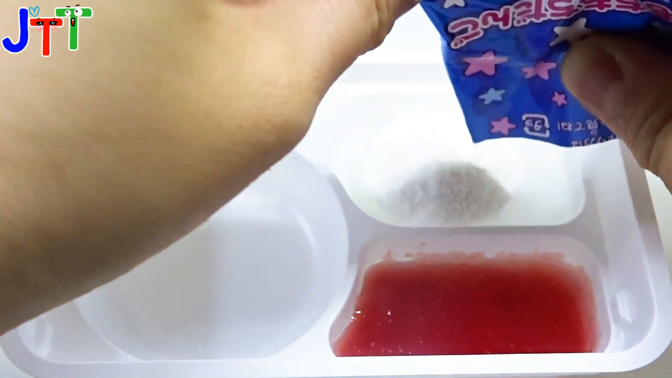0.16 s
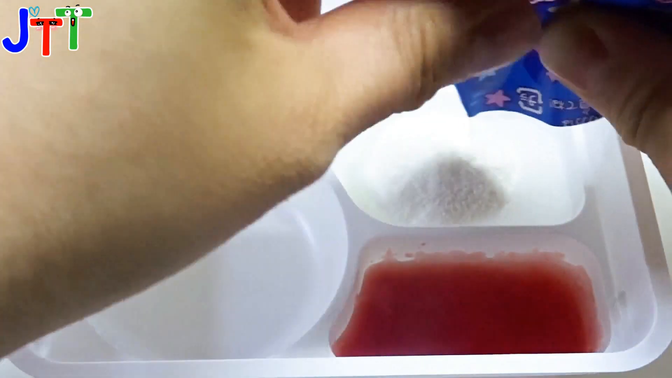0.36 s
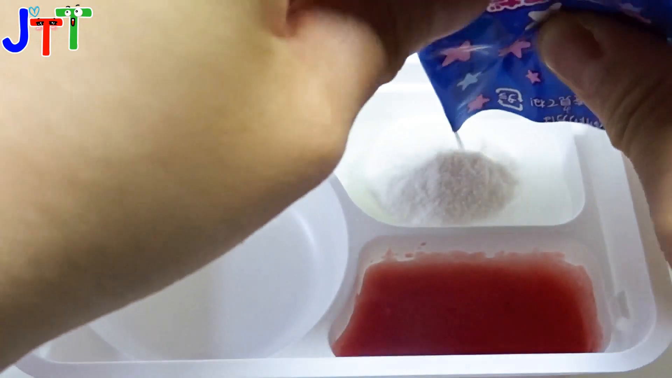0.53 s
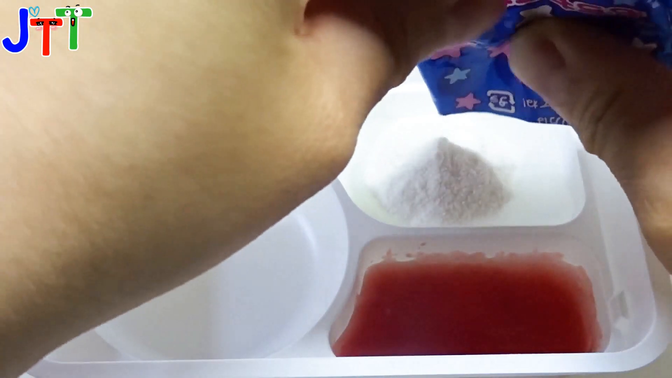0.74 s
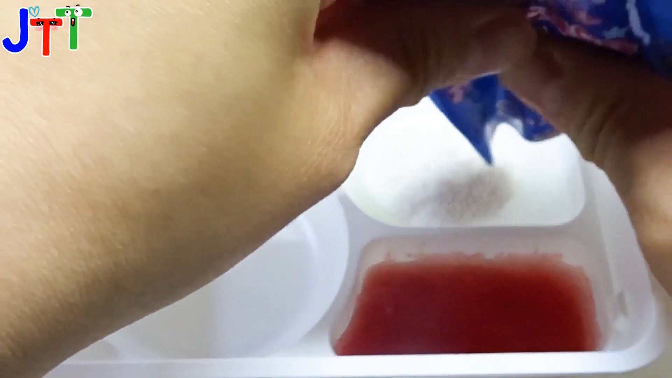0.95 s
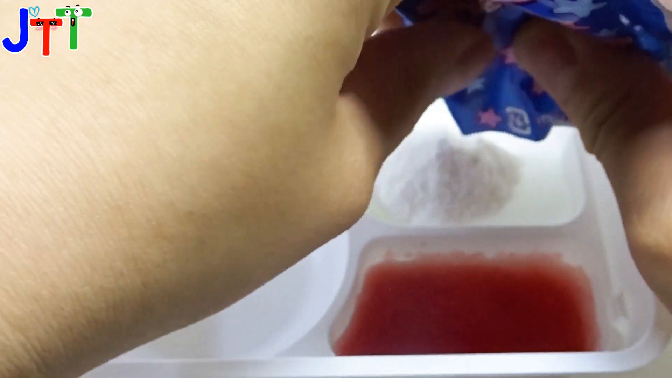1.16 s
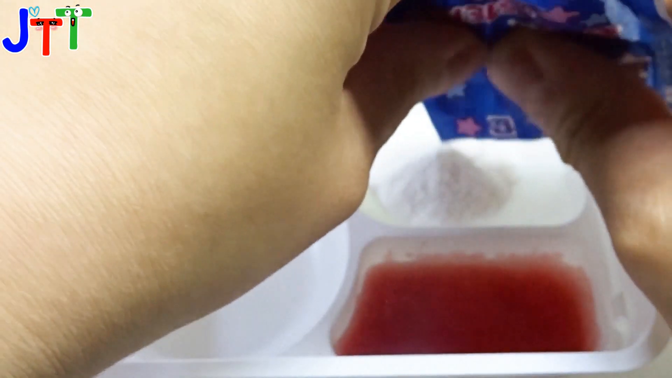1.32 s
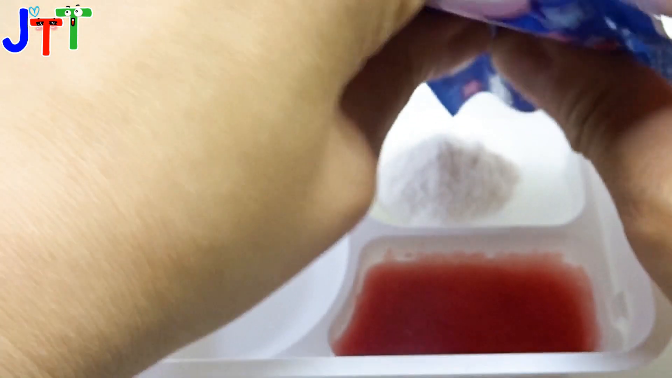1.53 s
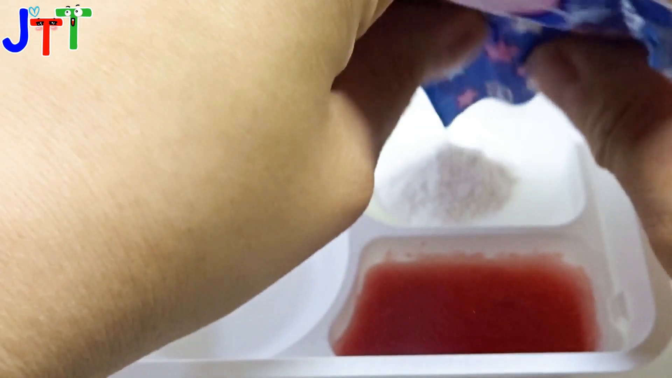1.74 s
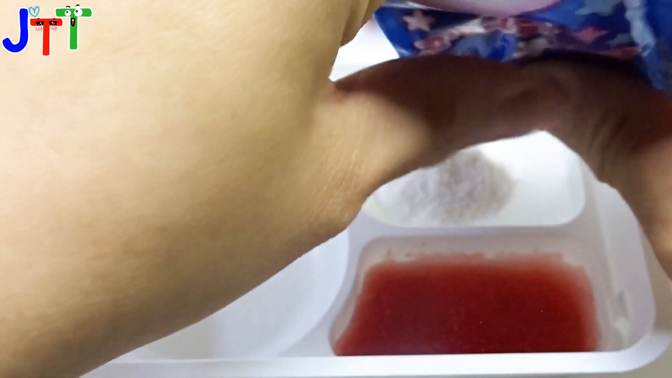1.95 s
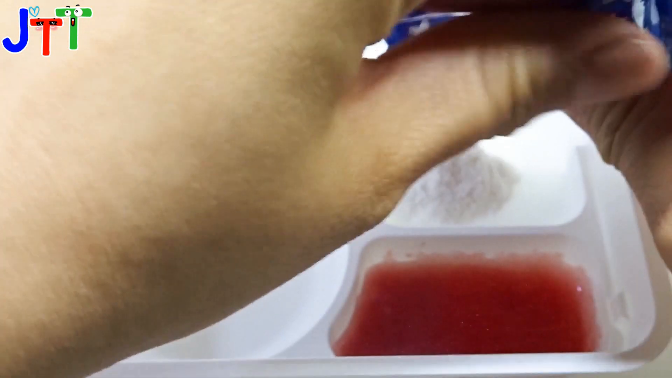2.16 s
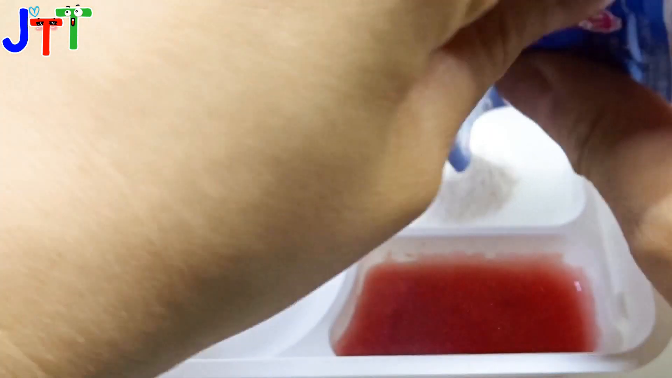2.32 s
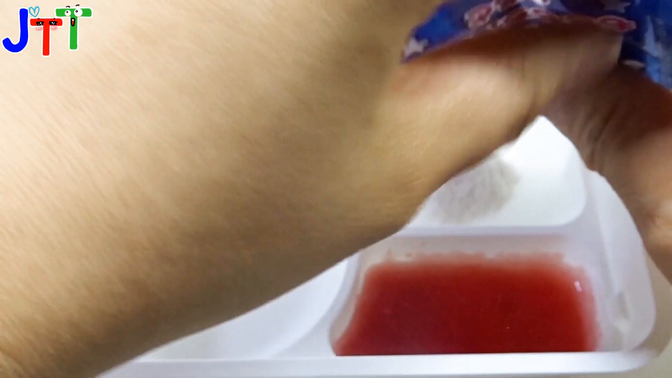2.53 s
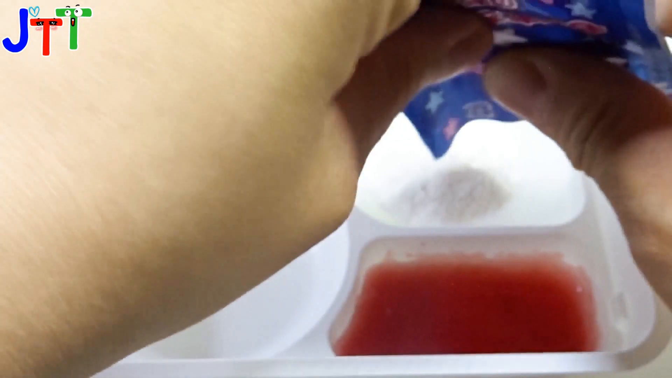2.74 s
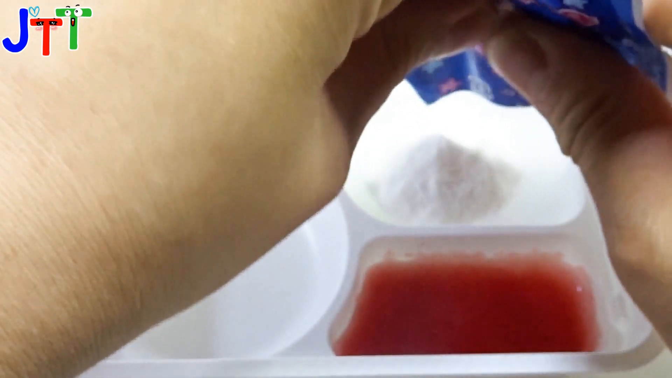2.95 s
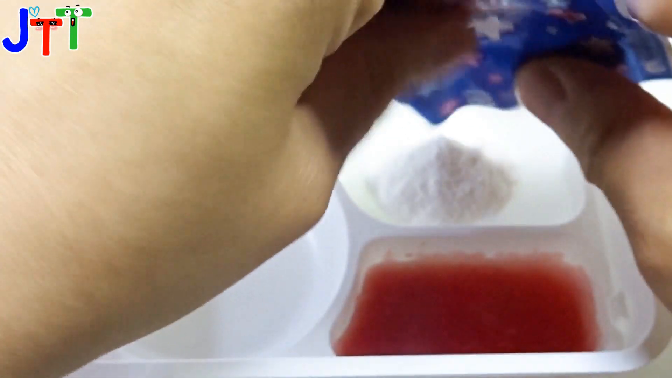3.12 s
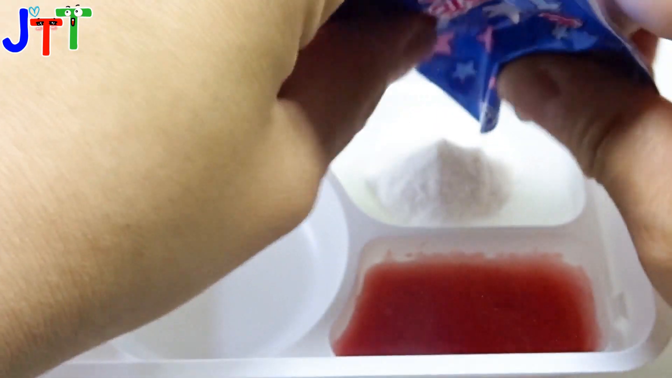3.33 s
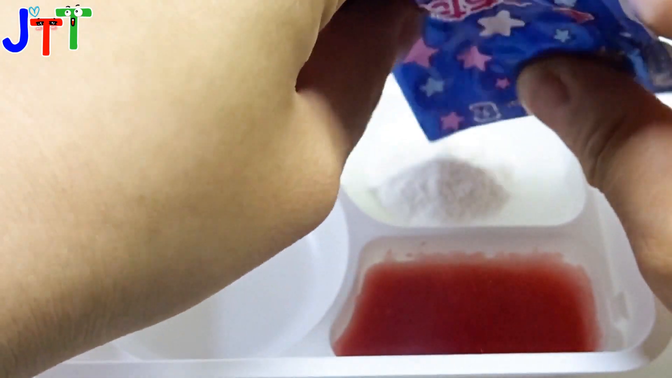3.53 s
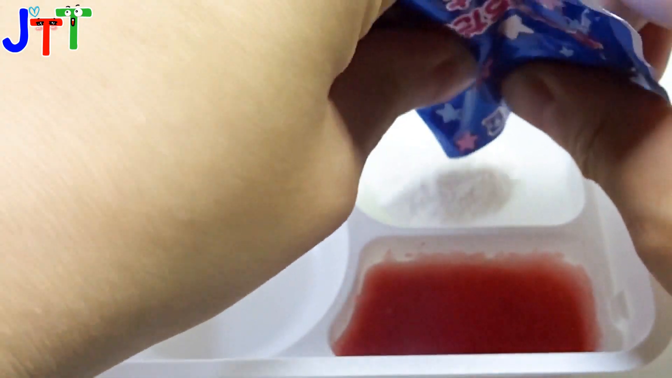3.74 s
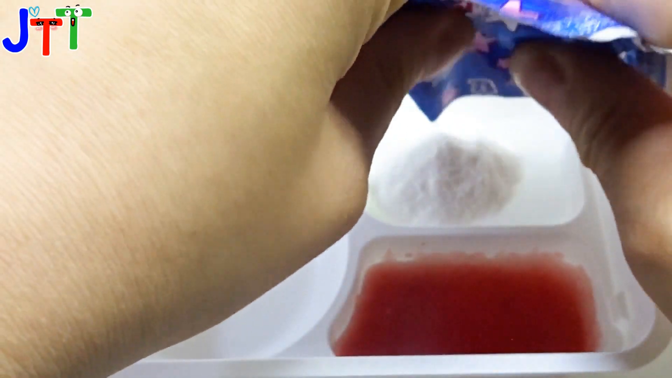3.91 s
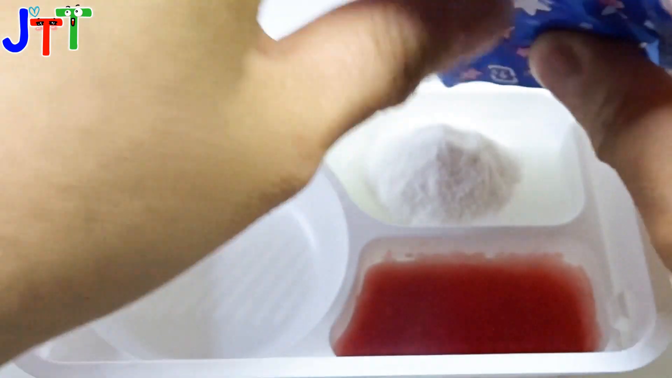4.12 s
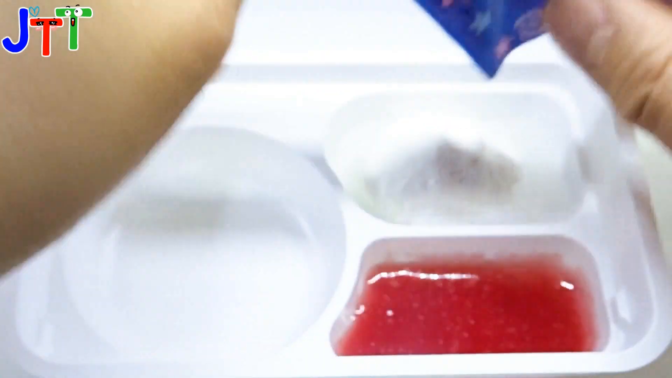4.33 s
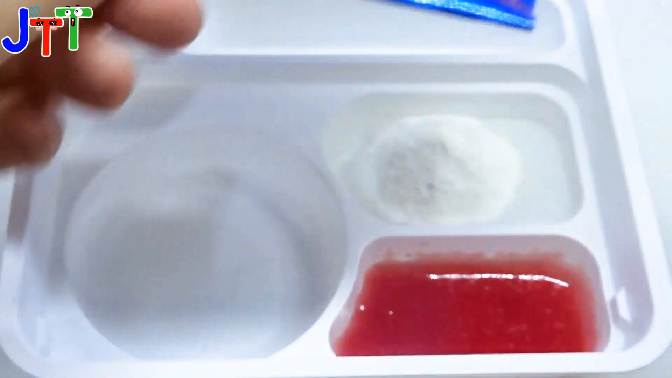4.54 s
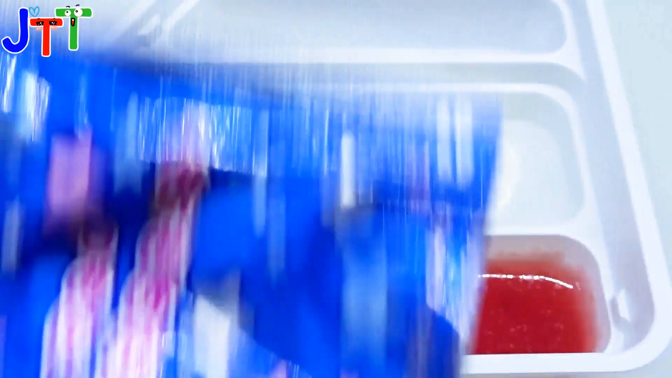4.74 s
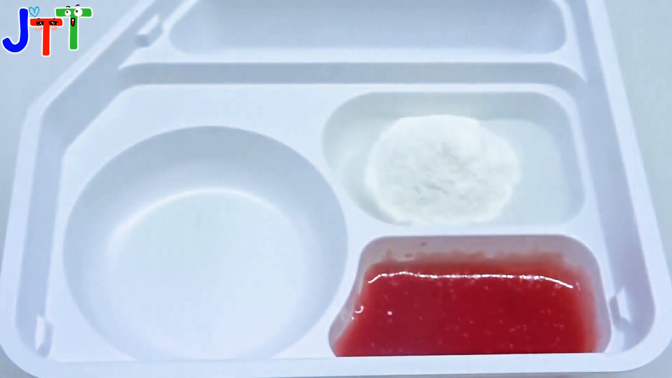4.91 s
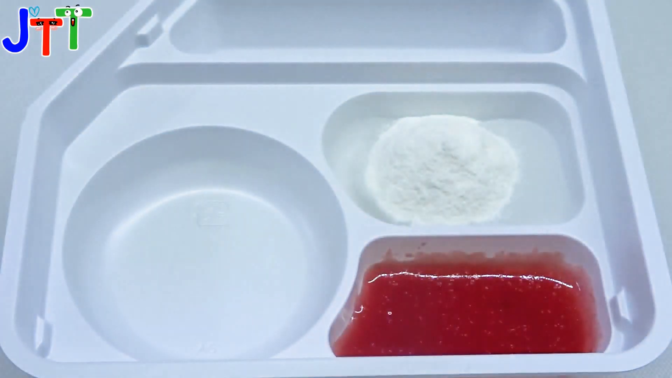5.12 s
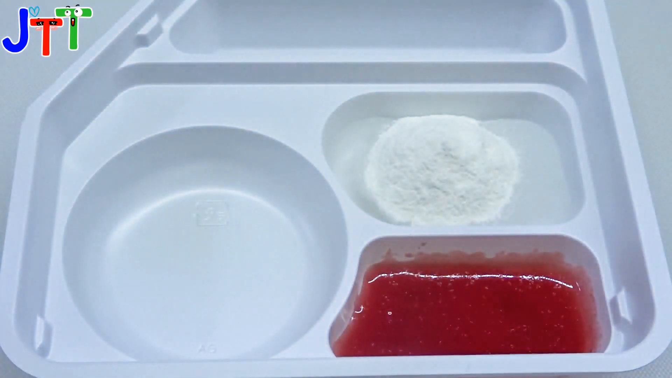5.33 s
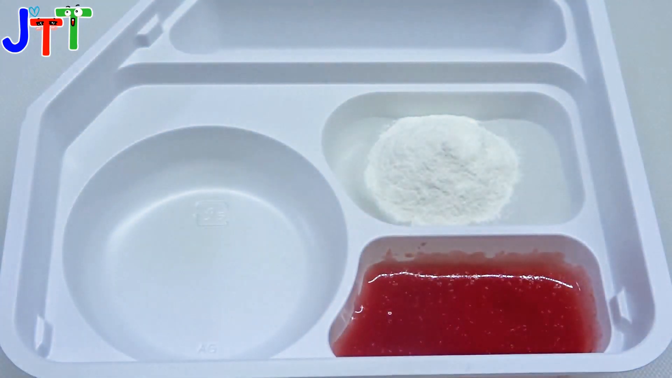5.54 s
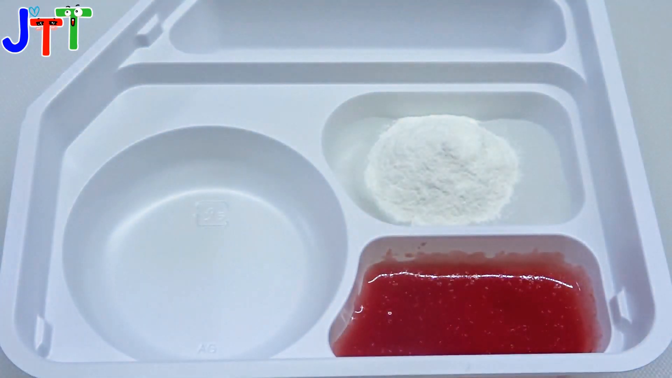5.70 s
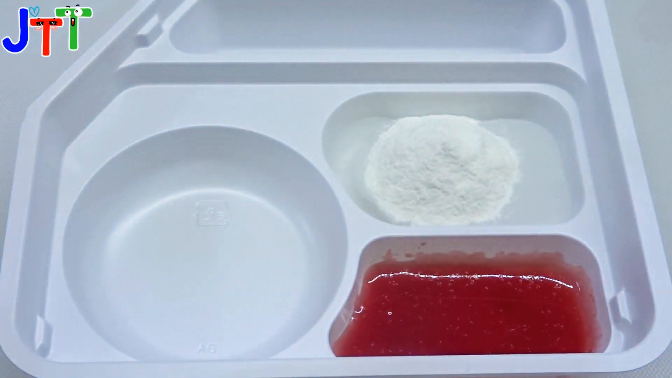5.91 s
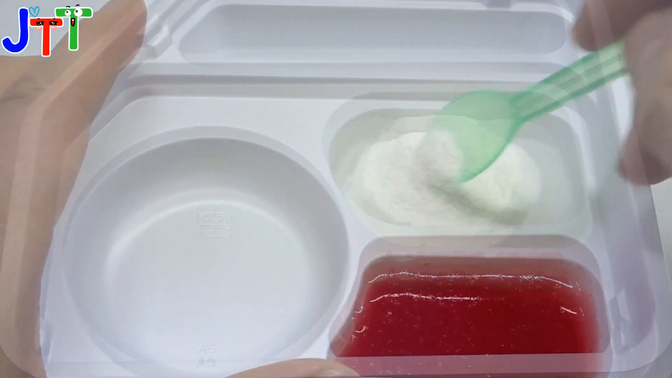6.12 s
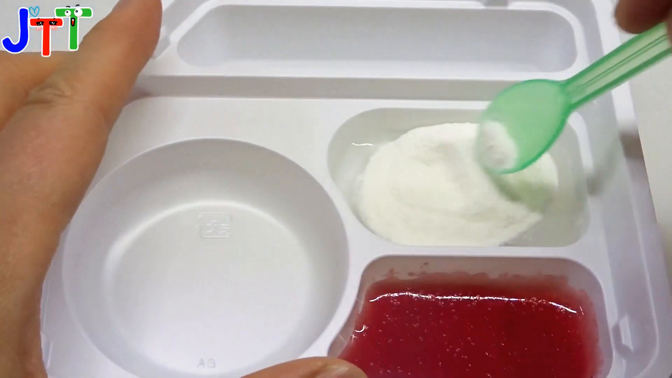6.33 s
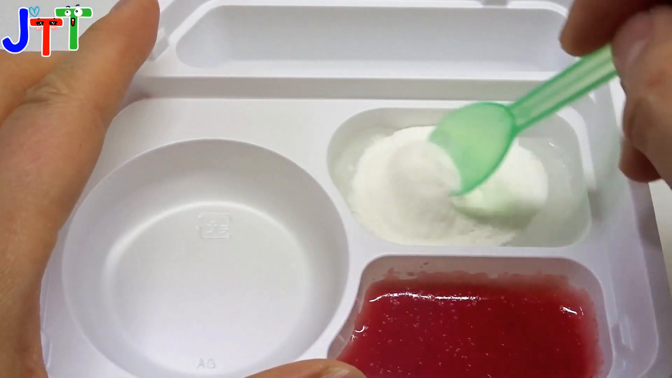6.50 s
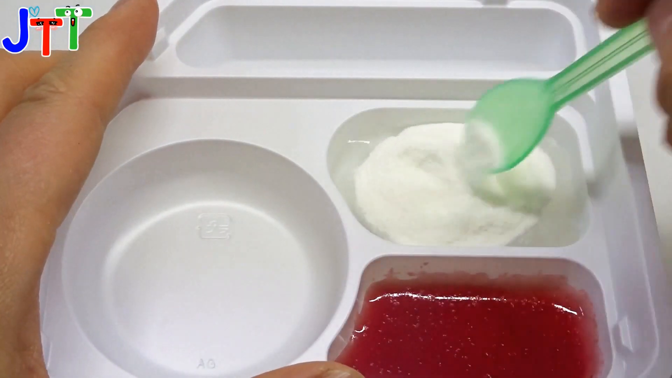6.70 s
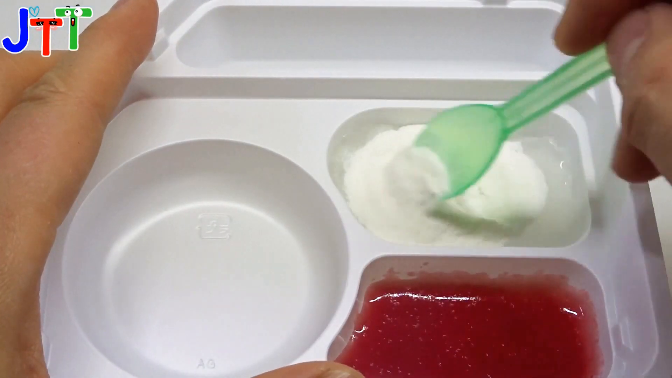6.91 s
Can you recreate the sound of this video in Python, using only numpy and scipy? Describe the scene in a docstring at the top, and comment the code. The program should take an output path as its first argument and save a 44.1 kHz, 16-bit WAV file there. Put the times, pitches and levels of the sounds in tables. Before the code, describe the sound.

Very close in a small room, a foil sachet is squeezed and shaken, giving crisp irregular snaps, fine crackle and a few dull bumps against a plastic tray. After nearly five seconds only a low, faint hum remains. Light plastic taps come, the sound abruptly drops and fades back with a higher hum and slight hiss, and a spoon knocks the tray and scrapes through powder.

```python
"""Over a low hum, foil creases snap one by one through a fine crackle, with soft bumps, close by in a small room.
Light plastic taps follow; the sound drops abruptly, fades in on a higher hum, and taps mix with gritty scrapes.
The foil sachet is squeezed and shaken: short noise bursts and swells of tiny grains ring its hollow body.
A plastic spoon knocks a resonant tray and ploughs powder, which is again made of swelling grains.
Filtered noise gives the air, wavering sines the hum, and decaying noise the room's echoes."""
import sys
import numpy as np
from scipy import signal
from scipy.fft import rfft
from scipy.io import wavfile
from scipy.ndimage import uniform_filter1d

SR = 44100
rng = np.random.default_rng(int(sys.argv[2]) if len(sys.argv) > 2 else 0)


def inscribe(sig):
    """Save sig as 16-bit PCM at rate SR to the path in sys.argv[1].

    A 1-D sig is mono; a 2-D sig holds one channel per row.
    Samples are clipped to [-1, 1] before scaling.
    """
    pcm = np.round(np.clip(np.atleast_2d(sig).T, -1, 1) * 32767)
    wavfile.write(sys.argv[1], SR, pcm.astype(np.int16))


N = 311346
TAPS = 4096  # length of the colouring filters
HZ, TIME = np.fft.rfftfreq(TAPS, 1 / SR), np.arange(N) / SR
BREAK_S = 6.028  # when the sound drops and the background moves up in pitch

# squeezes and shakes of the sachet, before layer trims:
# (start [s], end [s], level [dB], brightness [dB per octave])
SQUEEZE_MOVES = [(0.128, 0.144, -29, -1.2), (0.498, 0.58, -34.5, -1.5), (0.68, 0.734, -35, -1.0),
                 (0.771, 0.925, -41, -1.7), (1.123, 1.211, -35.5, -1.0), (1.228, 1.294, -36, -4.5),
                 (1.407, 1.563, -40, -0.8), (1.638, 1.761, -46, -6), (1.845, 1.928, -36, 0.6),
                 (1.95, 2.013, -33.5, -1.8), (2.087, 2.221, -37.5, -1.5), (2.361, 2.429, -37.5, -3.4),
                 (2.435, 2.53, -32.5, 0.3), (2.826, 2.918, -36.5, -2), (3.316, 3.445, -35.5, -1.5),
                 (3.495, 3.608, -42.5, -1), (3.704, 3.812, -42, -3), (3.822, 3.892, -37, -2.0),
                 (4.034, 4.137, -32, -0.3), (4.202, 4.28, -39.5, 2.5), (4.388, 4.445, -53.5, -10),
                 (4.464, 4.519, -40.5, -1.4), (4.568, 4.647, -40.5, 0.9), (4.753, 4.776, -43.5, -12.5)]
# spectrum of creasing foil: (frequency [Hz], level [dB])
FOIL_SPECTRUM = [(130, -33), (330, -13), (520, -12), (690, -6.5), (880, -7.5), (1100, -3.5), (1700, -1),
                 (2450, -3.5), (3100, 0), (3650, -2), (4250, 0), (4900, 0.5), (8500, 0), (12000, -8),
                 (14000, -18), (16000, -41)]
# spectrum of gritty powder, which also colours the hiss: (frequency [Hz], level [dB])
POWDER_SPECTRUM = [(200, -12), (1100, -7.5), (2400, 2.5), (3800, -0.5), (5800, 1.5), (9000, -7),
                   (15500, -11)]
# channel difference of sound from close by: (frequency [Hz], side over mid [dB])
NEAR_WIDTH = [(600, -24.5), (2000, -17), (12000, -2)]
# channel difference of sound from all around: (frequency [Hz], side over mid [dB])
DIFFUSE_WIDTH = [(40, -10), (150, -20.5), (350, -12.5), (750, -5), (2500, -0.5)]


def amp(db):
    """Decibels to amplitude."""
    return 10 ** (np.asarray(db) / 20)


def rms(x):
    """Root mean square over all channels, kept above zero."""
    return np.sqrt(np.mean(x ** 2) + 1e-20)


def read(points, hz):
    """Reads a table by straight lines over log frequency."""
    f, value = np.transpose(points)
    return np.interp(np.log(hz + 1), np.log(f + 1), value)


def tilted(spectrum, db_per_octave):
    """Large facets and slow contacts sound dull, small and quick ones bright."""
    pivot_hz, flat_below_hz = 3500, 1000
    octaves = np.log2(np.maximum(HZ, flat_below_hz) / pivot_hz)
    return read(spectrum, HZ) + db_per_octave * octaves


def colour(x, db):
    """Causal minimum-phase filter with the given gain at each of HZ."""
    log_gain = np.log(amp(np.r_[db, db[-2:0:-1]]))
    response = np.fft.ifft(np.exp(np.conj(signal.hilbert(log_gain)))).real
    return signal.fftconvolve(x, response)


def stereo(pair, db, width):
    """Colours two signals into mid and side, with the width set over frequency."""
    mid = colour(pair[0], db)
    side = colour(pair[1], db + read(width, HZ))
    return np.array([mid + side, mid - side])


def add(mix, s, sound):
    """Lays a sound into the mix at s seconds, cut at the end of the mix."""
    part = mix[:, round(s * SR):][:, :sound.shape[1]]
    part += sound[:, :part.shape[1]]


def ring(x, modes):
    """What a body with these resonances adds to a sound."""
    out = 0
    for hz, width, db in modes:
        out = out + amp(db) * signal.lfilter(*signal.iirpeak(hz, hz / width, SR), x)
    return out


def click(shape_db, level_db, ring_s, after_db, after_s, facet_db):
    """A sudden buckle, a second slip just behind it and a weak after-ring, with resonances of its own."""
    t = TIME[:TAPS // 2]
    since_slip = t - (1 + 2 * rng.random()) * ring_s
    slip = rng.random() ** 2 * (since_slip > 0) * np.exp(-abs(since_slip) / ring_s)
    envelope = np.exp(-t / ring_s) + slip + amp(after_db) * np.exp(-t / after_s)
    attack = np.minimum(t * 4000, 1)  # a quarter of a millisecond
    pair = rng.standard_normal((2, len(t))) * envelope * attack
    pair[0, SR // 4000] += 2 * rng.choice([-1, 1])  # the blow, as the attack ends
    # the blow is evened out over frequency, so its broad colour comes from the thing that rings
    uneven_db = 10 * np.log10(uniform_filter1d(abs(rfft(pair[0], TAPS)) ** 2, size=70))
    pair[0] = colour(pair[0], uneven_db.mean() - uneven_db)[:len(t)]
    facets = uniform_filter1d(rng.standard_normal(len(HZ)), size=60)
    sound = stereo(pair, shape_db + facet_db * facets / rms(facets), NEAR_WIDTH)
    return amp(level_db) * sound / rms(sound[:, :SR // 200])  # level over the first 5 ms


def grains(count, per_s, spread_db):
    """Two noises follow one train of tiny slips: very many small ones, a few large."""
    steps = np.minimum(rng.exponential(1, count), 6)
    happens = rng.random(count) < per_s / SR
    size = amp(spread_db * steps) * happens
    decay = np.exp(-1 / (.0007 * SR))  # the power of each slip dies in 0.7 ms
    power = signal.lfilter([1], [1, -decay], size ** 2)
    return rng.standard_normal((2, count)) * np.sqrt(power)


def rub(rows, spectrum, per_s, spread_db, taper):
    """Each movement is a swell of grains."""
    out = np.zeros((2, N))
    for start, end, level_db, tilt in rows:
        count = max(round((end - start) * SR), SR // 200)
        pair = grains(count, per_s, spread_db) * signal.windows.tukey(count, taper)
        sound = stereo(pair, tilted(spectrum, tilt), NEAR_WIDTH)
        add(out, start, amp(level_db) * sound / rms(sound[:, :count]))
    return out


def background(hiss_db):
    """After the break the whole background sits higher in pitch and a faint hiss joins it."""
    noise = rng.standard_normal((2, N))
    hiss = stereo(noise, read(POWDER_SPECTRUM, HZ), NEAR_WIDTH)[:, :N]
    before = ambience(air_db=-58.0, waver=0.15)
    after = ambience(air_db=-58.5, waver=0.15, raised=True)
    after += amp(hiss_db) * hiss / rms(hiss)
    return np.where(TIME < BREAK_S, before, after)


def ambience(air_db, waver, raised=False):
    """Air noise and machine tones of slightly wavering phase, all moved up in frequency when raised."""
    # room air before any raise: (frequency [Hz], level [dB])
    air_spectrum = [(20, -13), (65, -18), (160, -3.5), (300, -2), (480, -9), (850, -15.5), (1480, -17.5),
                    (1540, -9), (1610, -17), (4000, -27), (9000, -30.5), (15500, -42)]
    # machine hum before any raise: (frequency [Hz], rms level [dB])
    hum_tones = [(108, -76), (229.3, -66), (242.2, -60.5), (320.3, -65)]
    pitch = 1.176 if raised else 1  # frequency ratio
    noise = rng.standard_normal((2, N))
    air = stereo(noise, read(air_spectrum, HZ / pitch), DIFFUSE_WIDTH)[:, :N]
    out = amp(air_db) * air / rms(air)
    knots = np.linspace(0, TIME[-1], N // (SR // 2))  # about two a second
    for hz, db in hum_tones:
        drift = np.interp(TIME, knots, rng.standard_normal(len(knots)))
        phase = 2 * np.pi * (hz * pitch * TIME + rng.random()) + waver * drift
        out += amp(db) * np.sqrt(2) * np.sin(phase)
    return out


def sachet():
    """Loud snaps, crackle under each squeeze and small creases around them all ring the hollow sachet."""
    # the loudest creases, before the snap trim:
    # (time [s], level over 5 ms [dB], brightness [dB per octave])
    loud_snaps = [(0.1395, -25.5, 1.5), (0.196, -30.5, -3), (0.2318, -35.0, 3), (0.319, -28.5, 0.4),
                  (0.4395, -37.5, 1), (0.547, -25.5, 0), (0.565, -30.0, 0.8), (0.6382, -28.5, 2.2),
                  (0.6548, -34, -1.7), (0.6824, -28.5, 2.5), (0.7213, -31.5, 2), (0.7857, -23, 3.7),
                  (0.8415, -25, -1.1), (0.857, -34.5, -0.5), (0.879, -25, 2.5), (0.885, -23, 2.5),
                  (0.8889, -27.5, 3), (1.177, -24.5, 4.5), (1.2369, -23, 1), (1.262, -26.5, 1.3),
                  (1.2771, -27.5, 1.2), (1.3113, -24.5, 9.5), (1.4475, -28, -0.2), (1.485, -24.5, 1.1),
                  (1.5109, -20, 1), (1.5937, -25.5, 2.5), (1.6366, -22.5, 1), (1.6704, -25.5, 0.5),
                  (1.6965, -25, 0), (1.7103, -20, 1.2), (1.7293, -28.5, -1), (1.7465, -23.5, -1.6),
                  (1.7797, -25.5, -0.6), (1.8168, -31.5, 2), (1.8889, -28.5, 0), (1.9183, -33.5, 2.5),
                  (1.9509, -18.5, -0.5), (1.9817, -22.5, 1.2), (2.028, -27.5, 2), (2.1034, -22.0, -1.7),
                  (2.1884, -20.5, -1.8), (2.2969, -34, -2.8), (2.3625, -27.5, -2), (2.4393, -24, -1),
                  (2.4513, -24, 1), (2.5189, -29.5, 7), (2.582, -31.5, 1.3), (2.6252, -37, -0.5),
                  (2.674, -30, 3), (2.7046, -36.5, -1.4), (2.837, -28.5, 3), (2.9825, -42, -2),
                  (3.0813, -32, -0.5), (3.0933, -31.5, -1), (3.172, -31.5, 4.3), (3.2791, -26.5, 3.2),
                  (3.3424, -25.5, 9), (3.4072, -20, 7), (3.4383, -27.5, -0.5), (3.492, -32.5, 0.8),
                  (3.5581, -27.5, -1.5), (3.7993, -31, -2), (3.8318, -20.5, 2.5), (3.8864, -25.5, -0.9),
                  (3.941, -35.5, -2.7), (4.0411, -29, 1.2), (4.071, -23.0, 4.5), (4.107, -22.5, -1.6),
                  (4.237, -32.5, -9), (4.2675, -33, -3), (4.5092, -27, 3.7), (4.5722, -31.5, 8),
                  (4.6871, -36.0, 4.5)]
    # resonances of the hollow sachet: (frequency [Hz], width [Hz], level [dB])
    pouch_modes = [(3070, 340, -2), (4220, 150, 3)]
    # how strongly they ring as the grip changes: (time [s], level [dB])
    pouch_grip = [(0.6, -28), (0.85, -5.5), (1.3, -7.5), (1.75, 2.5), (2.45, -4), (2.9, 0.5), (4.7, -27)]
    snap_trim_db, crackle_trim_db = 0.31, -5
    rustle_db, rustle_growth = -51, .24  # level at full strain, exponent of its growth with strain

    snaps = amp(snap_trim_db) * creases(loud_snaps)
    crackle = rub(SQUEEZE_MOVES, FOIL_SPECTRUM, per_s=900, spread_db=3.4, taper=.15)
    # the foil keeps rustling softly while it is strained, shortly before and after each snap
    strain = signal.fftconvolve(snaps[0] ** 2, signal.windows.hann(SR * 3 // 10), "same")
    ticks = grains(N, per_s=500, spread_db=4.2)
    ticks = stereo(ticks, read(FOIL_SPECTRUM, HZ), NEAR_WIDTH)[:, :N]
    rustle = ticks / rms(ticks) * (abs(strain) / strain.max()) ** rustle_growth

    foil = snaps + creases(small_creases()) + creases(stray_ticks())
    foil += amp(crackle_trim_db) * crackle + amp(rustle_db) * rustle
    grip = amp(np.interp(TIME, *np.transpose(pouch_grip)))
    return foil + ring(foil * grip, pouch_modes)


def creases(rows):
    """Each crease buckles once and rings the foil: a quick decay, then a longer, weaker after-ring."""
    out = np.zeros((2, N))
    for s, level_db, tilt in rows:
        snap = click(tilted(FOIL_SPECTRUM, tilt), level_db,
                     ring_s=.0009, after_db=-15.5, after_s=.006, facet_db=3.9)
        add(out, s, snap)
    return out


def small_creases():
    """Lesser creases give way at random through each squeeze, following its loudness and brightness."""
    per_s, trim_db = 30, 3
    scatter_db, scatter_tilt = 4, 1.6  # up or down: dB, dB per octave
    rows = []
    for start, end, level_db, tilt in SQUEEZE_MOVES:
        count = int((end - start) * per_s)
        for k, (when, size, bright) in enumerate(rng.uniform(-1, 1, (count, 3))):
            s = start + (k + .5 + .5 * when) / count * (end - start)
            rows.append((s, level_db + trim_db + scatter_db * size, tilt + scatter_tilt * bright))
    return rows


def stray_ticks():
    """Tiny creases relax at random for as long as the sachet is held."""
    count, first_s, last_s = 56, 0.2, 4.7
    level_db, scatter_db = -47.5, 5
    when, size, bright = rng.random((count, 3)).T
    times = np.interp(np.arange(count) + when, [0, count], [first_s, last_s])
    return zip(times, level_db + scatter_db * (2 * size - 1), 2 * (2 * bright - 1))


def bumps():
    """Hand and sachet brush the tray with a dull, grainy thud."""
    # soft bumps: (start [s], end [s], level [dB], brightness [dB per octave])
    bump_moves = [(.135, .16, -51, 2), (.252, .266, -46, -1), (.51, .585, -46.5, -10),
                  (2.84, 2.92, -50.5, 3), (3.32, 3.44, -48, 3), (4.235, 4.285, -47, 0),
                  (4.57, 4.65, -53, 4.5)]
    # spectrum of a bump: (frequency [Hz], level [dB])
    thud_spectrum = [(120, -22), (340, -1), (500, -6), (680, -0.5), (880, -6.5), (1100, -5), (1800, -13.5),
                     (4000, -23.5), (15000, -51.5)]
    return rub(bump_moves, thud_spectrum, per_s=300, spread_db=3, taper=.4)


def room(x, wet_db, ring_db, early_db):
    """Quick echoes off table and hands, a diffuse tail whose treble dies first, and one faint ring."""
    # room decay: (frequency [Hz], time to fall 60 dB [s])
    room_decay = [(1600, 0.63), (12000, 0.063)]
    hz, t, z = signal.stft(rng.standard_normal((2, SR // 2)), SR, nperseg=256)
    fall = amp(-60 * t / read(room_decay, hz)[:, None])
    pair = signal.istft(z * fall, SR, nperseg=256)[1]
    t = TIME[:pair.shape[1]]
    pair *= (t > .002) * (1 + amp(early_db) * np.exp(-t / .008))  # 2 ms gap, then strong early echoes
    pair[0] += amp(ring_db - 60 * t / 2.4) * np.sin(2 * np.pi * 1545 * t)
    tail = stereo(pair, np.zeros(len(HZ)), DIFFUSE_WIDTH)
    tail /= np.linalg.norm(tail[0])
    return amp(wet_db) * signal.fftconvolve(x, tail, axes=1)[:, :N]


def spoon():
    """Plastic knocks on plastic ring the tray, and the bowl of the spoon ploughs the powder."""
    # light knocks on the tray, before trim: (time [s], level over 5 ms [dB], brightness [dB per octave])
    knock_hits = [(5.717, -60.5, -.5), (5.833, -53.5, 1.5), (5.847, -56, -0.5), (6.061, -52, -1.5),
                  (6.249, -48, 2), (6.360, -45, 4), (6.369, -42.5, -1.5), (6.407, -41.5, 2.5)]
    # spectrum of the tray: (frequency [Hz], level [dB])
    tray_spectrum = [(150, -21), (430, -3), (1150, -11), (1700, -3), (2100, 2), (2500, -5.5), (3500, -13),
                     (4300, -10.5), (5600, -25.5), (15000, -33.5)]
    # resonances of the tray: (frequency [Hz], width [Hz], level [dB])
    tray_modes = [(463, 120, -3), (2120, 330, -8)]
    # strokes through the powder: (start [s], end [s], level [dB], brightness [dB per octave])
    powder_strokes = [(6.17, 6.235, -58, -1.5), (6.355, 6.46, -56, -.6), (6.59, 6.67, -52.5, 1.2),
                      (6.67, 6.79, -66, -10), (6.795, 6.865, -62, -0.5), (7.01, 7.08, -54.5, 1)]
    knocks = np.zeros((2, N))
    for s, level_db, tilt in knock_hits:
        knock = click(tilted(tray_spectrum, tilt), level_db,
                      ring_s=.0016, after_db=-15, after_s=.009, facet_db=1)
        add(knocks, s, knock)
    scrapes = rub(powder_strokes, POWDER_SPECTRUM, per_s=1400, spread_db=3.4, taper=.5)
    return amp(-1.0) * (knocks + ring(knocks, tray_modes)) + scrapes


def scene():
    """Sachet, bumps and spoon stand close by, excite the room and sit over the background."""
    near = sachet() + bumps() + spoon()
    near = near * amp([[.25], [-.25]])  # channel balance in dB
    echoes = room(near, wet_db=-13.0, ring_db=-22.5, early_db=15.5)
    return near + echoes + background(hiss_db=-71.0)


def record(dry):
    """The sound drops almost to nothing at the break and fades back in; then a low-pass limits the band."""
    rise = np.clip(0.031 + (TIME - BREAK_S) / 0.4, 0, 1)
    fade = np.where(TIME < BREAK_S, 1, rise)
    low_pass = signal.firwin(511, 16000, window=("kaiser", 9), fs=SR)  # cutoff in Hz
    return signal.oaconvolve(dry * fade, low_pass[None], "same")


dry = scene()
out = record(dry)
inscribe(out)
```